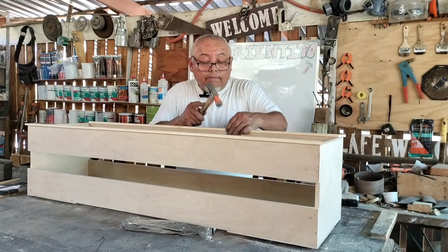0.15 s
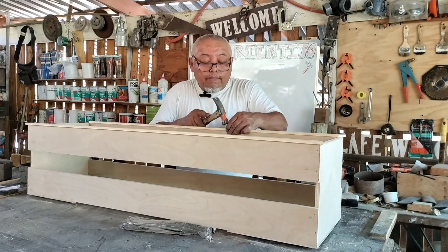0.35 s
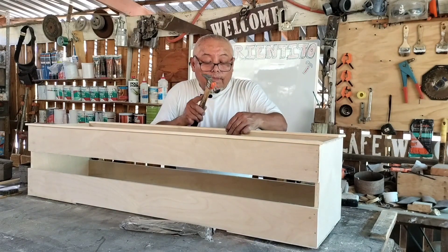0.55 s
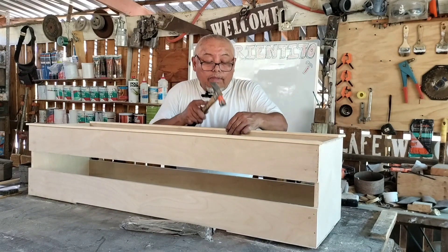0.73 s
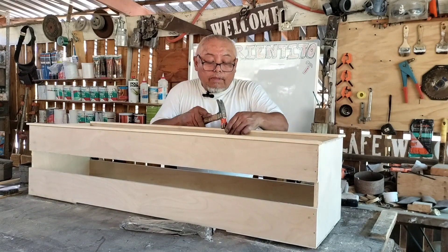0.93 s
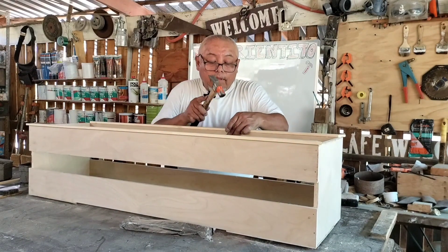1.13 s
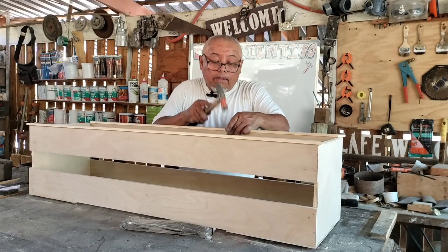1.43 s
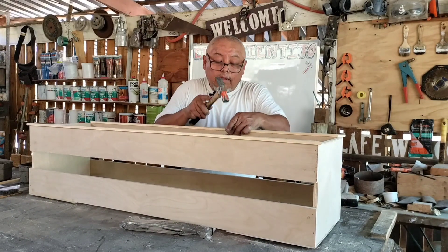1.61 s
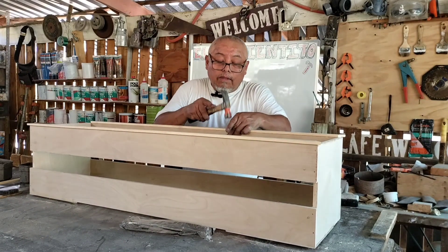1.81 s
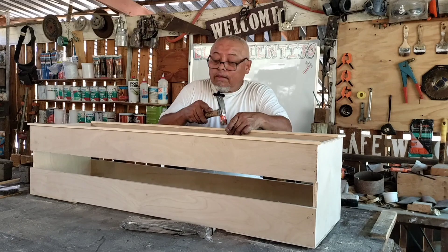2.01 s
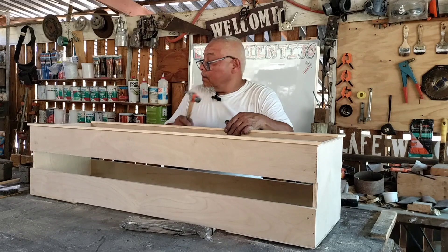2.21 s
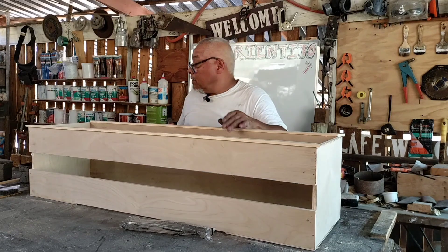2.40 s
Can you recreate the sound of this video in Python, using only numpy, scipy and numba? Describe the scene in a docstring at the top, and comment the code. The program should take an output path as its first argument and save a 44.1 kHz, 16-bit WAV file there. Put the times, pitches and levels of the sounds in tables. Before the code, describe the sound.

A hammer drives a nail into a plywood box in eight quick, loud blows. Each has a steel crack and clink over a hollow wooden knock, growing harder as the nail sinks, with a short workshop reverberation.

```python
"""A hammer drives a nail into a long plywood box on a workshop bench, over quiet room tone.
We open on the tail of one blow; eight more follow, quick and slightly hastening. Each is a short
steel crack and clink, a knock of the panels, then their ringing modes, spread by the reverberant shed.
As the nail sinks, thump and click give way to a harder midrange knock. A limiter flattens every blow."""
import sys
import numpy as np
from scipy import signal
from scipy.fft import rfft, irfft, next_fast_len
from scipy.io import wavfile
from scipy.ndimage import uniform_filter1d
from numba import njit

SR = 44100
rng = np.random.default_rng(int(sys.argv[2]) if len(sys.argv) > 2 else 0)


def transcribe(signal):
    """Save signal, clipped to [-1, 1], as a 16-bit WAV file at the path in sys.argv[1]."""
    frames = np.atleast_2d(signal).T
    limited = np.clip(frames, -1, 1)
    pcm = np.round(limited * 32767).astype(np.int16)
    wavfile.write(sys.argv[1], SR, pcm)


N = 112454

# stereo width, narrow in the bass and open on top: f/Hz, side minus mid/dB
WIDTH = [(60, -18), (160, -16), (350, -11), (700, -4.5), (1400, 1), (16000, 0)]


def amp(db):
    return 10 ** (np.asarray(db) / 20)


def rise(t, seconds):
    return 1 - np.exp(-np.maximum(t, 0) / seconds)


def bins(x):
    return np.fft.rfftfreq(x.shape[-1], 1 / SR)


def along(points, hz):
    """Read (f/Hz, value) points on a log-frequency axis."""
    f, v = np.array(points, float).T
    return np.interp(np.log(np.maximum(hz, 1)), np.log(f), v)


def stereo(noise, spectrum):
    """Colour two noises as mid and side; the left-right pair comes out at rms 1."""
    hz = bins(noise)
    coloured = rfft(noise) * amp(along(spectrum, hz))
    coloured[1] *= amp(along(WIDTH, hz))
    mid, side = irfft(coloured, noise.shape[-1])
    out = np.array([mid + side, mid - side])
    return out / np.std(out)


def even(noise, t, span_s, smooth_bins):
    """Noise whose opening span_s has no broad spectral holes or humps."""
    window = np.maximum(np.exp(-t / span_s), .01)
    for _ in range(3):
        power = uniform_filter1d(abs(rfft(noise * window)) ** 2, smooth_bins, axis=-1)
        noise = irfft(rfft(noise) / np.sqrt(power / power.mean()), len(t))
    return noise


def ring(t, modes, phases, rise_s):
    """Decaying modes; the higher ones reach the two sides out of step."""
    out = 0
    for (hz, db, t60), (cycles, spread) in zip(modes, phases):
        apart = .47 * spread * amp(along(WIDTH, hz)) * np.array([[1], [-1]])
        decay = np.exp(-np.log(1000) * t / t60)
        out = out + amp(db) * decay * np.sin(2 * np.pi * (hz * t + cycles) + apart)
    return rise(t, rise_s) * out


def equalise(x, points):
    """Minimum-phase EQ through (f/Hz, gain/dB) points: nothing rings ahead of the attack."""
    n = x.shape[-1]
    cepstrum = irfft(np.log(amp(along(points, bins(x)))), n)
    cepstrum[1:n // 2] *= 2
    cepstrum[n // 2 + 1:] = 0
    return irfft(rfft(x) * np.exp(rfft(cepstrum)), n)


def add(out, sound, start_s):
    """Mix a sound in at its time, trimmed to the scene."""
    i = int(round(start_s * SR))
    a, b = max(i, 0), min(i + sound.shape[-1], N)
    out[:, a:b] += sound[:, a - i:b - i]


def room_tone():
    """A quiet, dark bed of steady noise."""
    # background spectrum: f/Hz, level/dB
    spectrum = [(25, -24.5), (50, -5), (85, -0.5), (160, -8.5), (400, -8.5), (900, -17.5), (2000, -30.5),
                (4200, -35.5), (5500, -42.5), (9000, -50), (16000, -59)]
    return amp(-47.5) * stereo(rng.standard_normal((2, N)), spectrum)


def steel_crack(t, noise):
    """A few milliseconds of steel biting on steel."""
    # spectrum of the hit on the nail head: f/Hz, level/dB
    spectrum = [(300, -4.5), (1000, 6.5), (2000, -3.5), (2800, 3), (3250, -2), (4100, 0.5), (5400, -12),
                (6300, -6.5), (8300, -19.5), (10700, -10), (16000, -22)]
    rise_s, hold_s, fall_s = .0015, .0039, .0015
    envelope = rise(t, rise_s) * np.exp(-np.maximum(t - hold_s, 0) / fall_s)
    return amp(-12.5) * envelope * stereo(even(noise, t, hold_s, smooth_bins=1000), spectrum)


def steel_clink(t, phases):
    """Hammer head and nail ring briefly, tuned a little differently at each contact."""
    # modes of head and nail: f/Hz, level/dB, t60/s
    modes = [(1822, 0, 0.15), (2072, -3.5, 0.13), (2795, 1, 0.042), (4137, 0.5, 0.021), (6113, -13, 0.069),
             (7290, -13.5, 0.01)]
    detuned = [(hz * (1 + .008 * rng.standard_normal()), db, t60) for hz, db, t60 in modes]
    return amp(-19) * ring(t, detuned, phases, rise_s=.00083)


def panel_knock(t, noise):
    """The panels' dense, quickly damped vibration gives the blow its body."""
    # spectrum of the struck plywood: f/Hz, level/dB
    spectrum = [(40, -12), (90, -1), (220, 2), (420, -2), (590, -5.5), (840, 2.5), (1100, -10), (1500, -13),
                (3500, -23.5), (7000, -33), (16000, -48.5)]
    rise_s, fall_s = .0011, .02
    envelope = rise(t, rise_s) * np.exp(-t / fall_s)
    return amp(-6.5) * envelope * stereo(even(noise, t, fall_s, smooth_bins=140), spectrum)


def box_ring(t):
    """The box rings on in its modes, the deepest longest."""
    # modes of the plywood box: f/Hz, level/dB, t60/s
    modes = [(78.56, -16.5, 1), (108.9, -10, 0.53), (221.6, -1.5, 0.43), (258.8, 0, 0.42),
             (378.5, 2.5, 0.27), (446.3, -0.5, 0.42), (676, 2.5, 0.18), (785, -5, 0.28), (863, -6.5, 0.41),
             (1066, -20, 0.18), (1336, -4.5, 0.24), (1433, -14, 0.24), (1724, -12.5, 0.33),
             (1840, -18.5, 0.12)]
    phases = rng.standard_normal((len(modes), 2))
    return amp(-16.5) * ring(t, modes, phases, rise_s=.0027)


def shed_reverb(t, noise):
    """Dense reflections build up and die away, the treble first."""
    # colour of the reverb: f/Hz, level/dB
    spectrum = [(30, -18), (70, -11.5), (160, -2.5), (260, -0.5), (480, 4.5), (610, -2.5), (760, -2),
                (900, -5), (1150, -13.5), (1330, -5.5), (1600, -15), (2250, -15), (3100, -21),
                (4000, -20.5), (5500, -28.5), (8000, -34), (11000, -32), (16000, -36.5)]
    # decay of the shed by band: f/Hz, t60/s
    decays = [(60, 0.61), (160, 0.49), (420, 0.37), (1100, .43), (2900, 0.39), (4800, 0.33), (7000, 0.33),
              (10000, 0.23), (15000, 0.2)]
    predelay_s, rise_s = .0032, .0047
    wash = rfft(stereo(even(noise, t, span_s=.048, smooth_bins=44), spectrum))
    out = 0
    for centre, t60 in decays:
        band = along([(hz, hz == centre) for hz, _ in decays], bins(noise))  # fades into its neighbours
        out = out + irfft(wash * band, len(t)) * np.exp(-np.log(1000) * t / t60)
    return amp(-6.5) * rise(t - predelay_s, rise_s) * out


def scene():
    """The same steel, box and shed answer every blow, changing a little as the nail sinks."""
    # hammer blows: t/s, level/dB, thump/dB, knock/dB, bite/dB, click/dB, tail/dB
    blows = [(-0.095, -3, 2, -2.5, -5, 1.5, -0.6), (0.2127, 1.5, 3, -1.5, -2, 5, -4.5),
             (0.5132, 1.46, -0.1, -1.6, -2.2, 1, -1.27), (0.8025, -0.2, 0.3, 0.2, 2.1, -1, 1.2),
             (1.083, 1.2, -0.5, -0.2, -0.8, 0.2, -0.5), (1.356, 1.15, -2.5, 2.5, 1.6, -1, 0.5),
             (1.6217, 1.64, -2.5, 4, 3, -2, 1), (1.884, 1.35, -4.5, 5.5, 4.5, -1.5, 2.1),
             (2.118, 0.74, -4.5, 4, 6.5, -2, 1.47)]
    blow_s, morph_rad, scatter = .8, .45, .4
    t = np.arange(2 * next_fast_len(int(blow_s * SR / 2), True)) / SR
    early, late = rng.standard_normal((2, 3, 2, len(t)))
    box = box_ring(t)
    steel_phases = rng.standard_normal((6, 2))  # phase and spread for each steel mode
    out = room_tone()
    for k, (start, db, thump_db, knock_db, bite_db, click_db, tail_db) in enumerate(blows):
        # the grain shifts from blow to blow, steadily and by chance
        grain = np.cos(k * morph_rad) * early + np.sin(k * morph_rad) * late
        crack_noise, knock_noise, shed_noise = grain + scatter * rng.standard_normal(grain.shape)
        attack = steel_crack(t, crack_noise) + steel_clink(t, steel_phases) + panel_knock(t, knock_noise)
        tail = amp(tail_db) * (box + shed_reverb(t, shed_noise))
        colour = [(85, 1.4 * thump_db), (190, thump_db), (420, 0),
                  (780, knock_db), (1700, bite_db), (9000, click_db)]
        add(out, amp(db) * equalise(attack + tail, colour), start)
    return out


@njit
def follow(x, attack, release):
    """Peak follower for the limiter."""
    out, level = np.empty(len(x)), 0.
    for i in range(len(x)):
        level += (x[i] - level) * (attack if x[i] > level else release)
        out[i] = level
    return out


def record(dry):
    """The microphone loses deep bass; a fast limiter, a soft clip and a top cut follow."""
    low_cut_hz, top_hz = 53, 15750
    threshold_db, attack_s, release_s = -3.5, .00025, .013
    heard = signal.sosfilt(signal.butter(2, low_cut_hz, "high", fs=SR, output="sos"), dry)
    peak = follow(abs(heard).max(axis=0), rise(1 / SR, attack_s), rise(1 / SR, release_s))
    held = heard * np.minimum(1, amp(threshold_db) / (peak + 1e-9))
    rounded = held / (1 + held ** 4) ** .25
    return signal.sosfilt(signal.ellip(10, .2, 80, top_hz, fs=SR, output="sos"), rounded)


dry = scene()
out = record(dry)
transcribe(out)
```